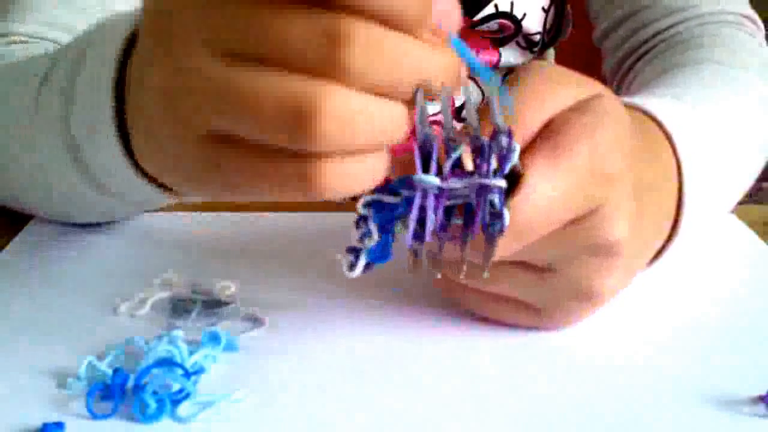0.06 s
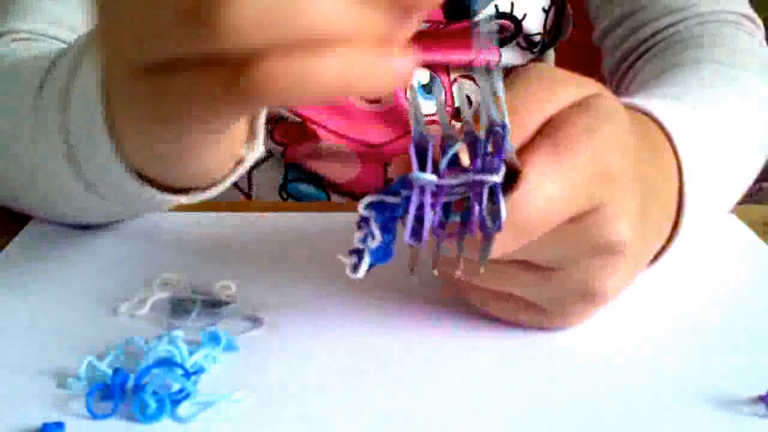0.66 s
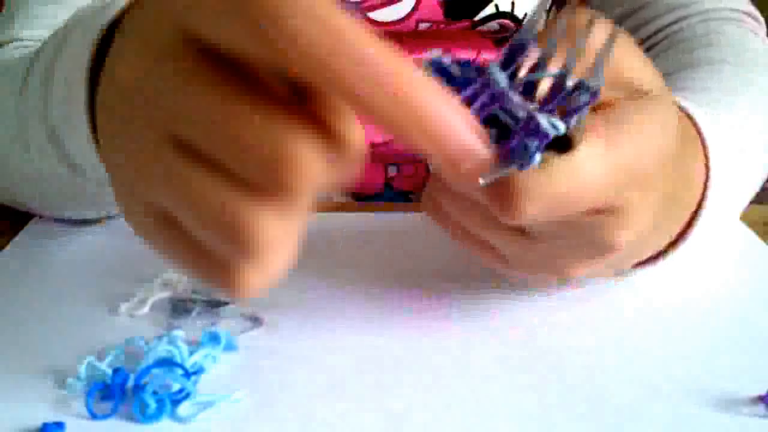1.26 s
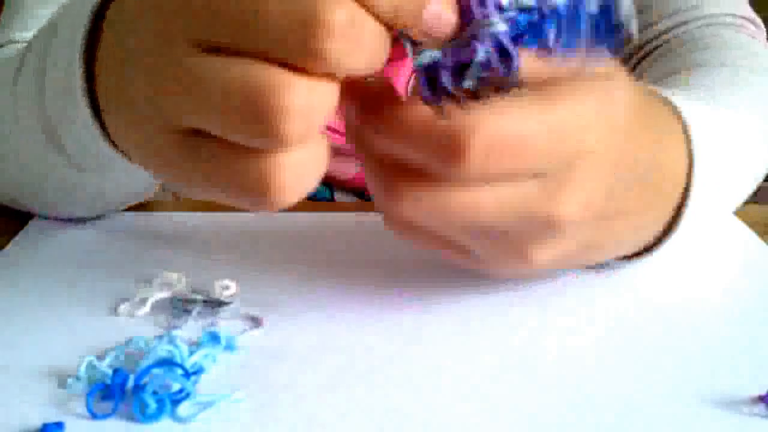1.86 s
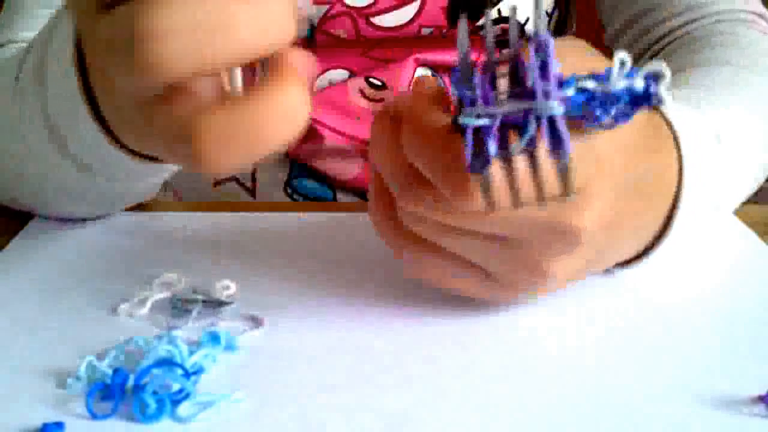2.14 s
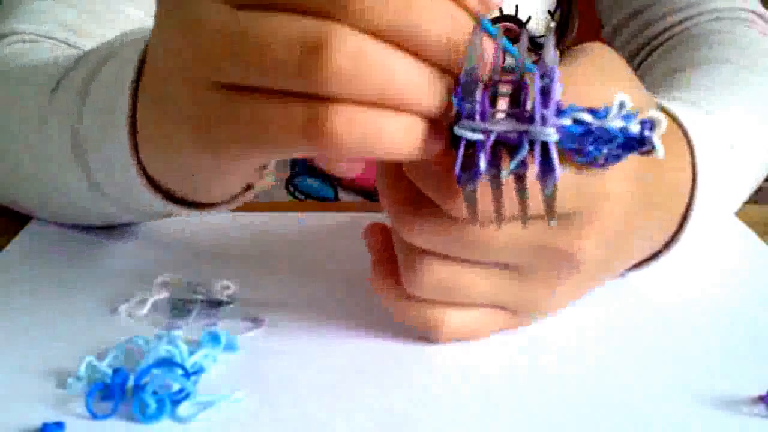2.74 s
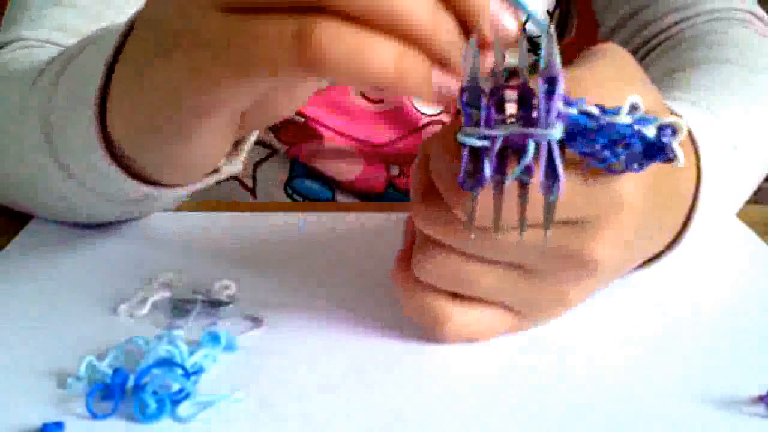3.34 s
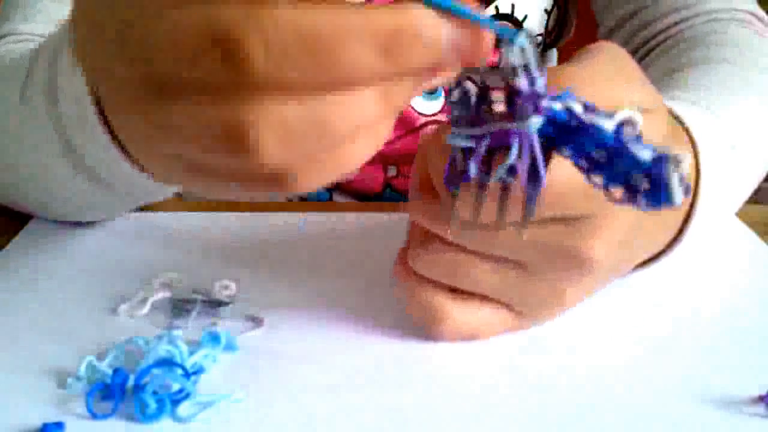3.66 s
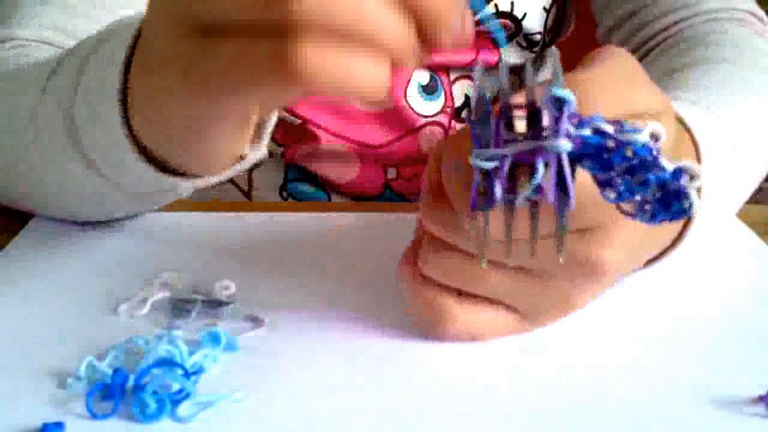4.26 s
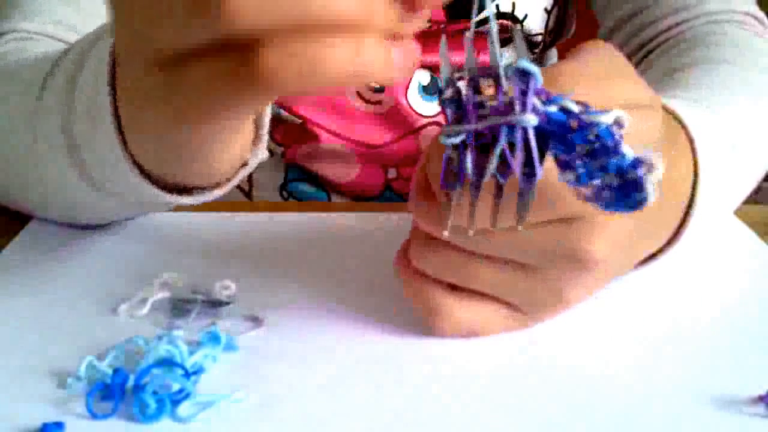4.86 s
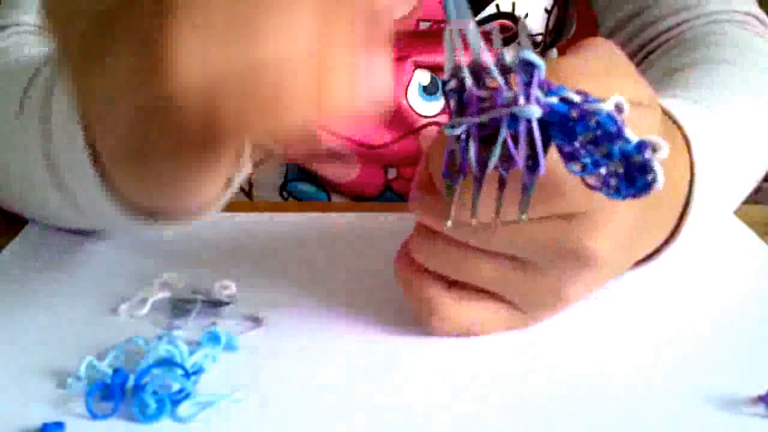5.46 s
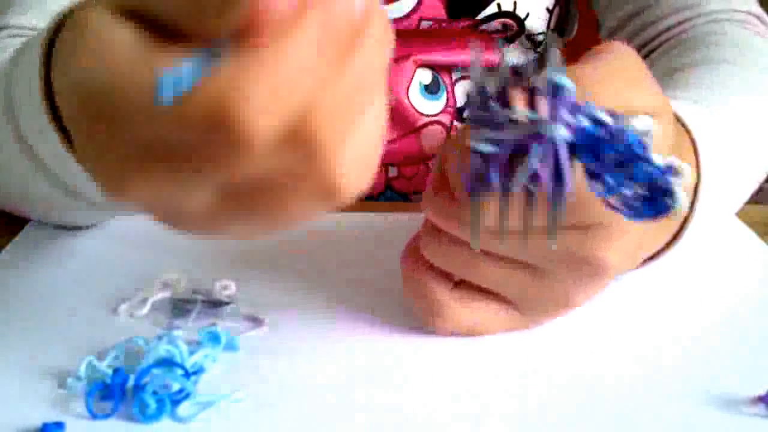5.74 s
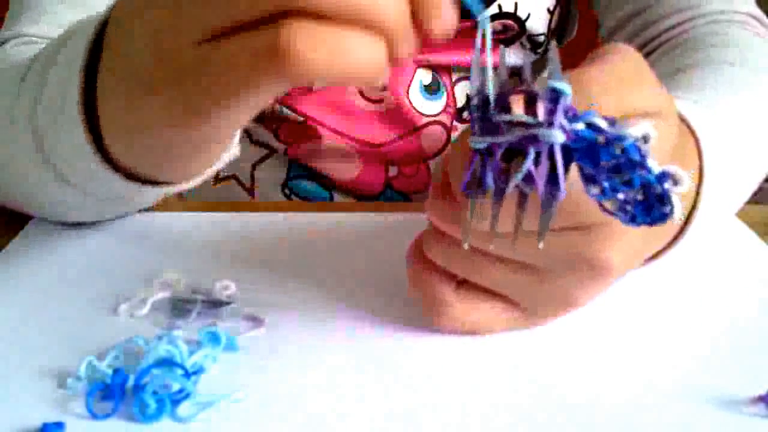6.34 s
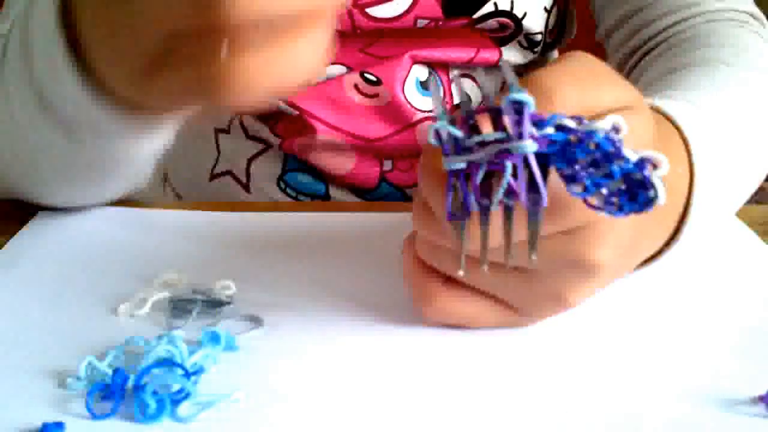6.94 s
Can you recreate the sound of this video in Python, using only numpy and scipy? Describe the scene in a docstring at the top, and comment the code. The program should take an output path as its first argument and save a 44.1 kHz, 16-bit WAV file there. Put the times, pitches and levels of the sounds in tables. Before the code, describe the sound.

Steady microphone hiss and low rumble fill a small room, with a clock ticking very faintly about once a second. Rubber bands snap lightly off fork prongs, and about two seconds in the forks hit the table with one loud, rattling knock that makes the hiss dip for a moment. Then a plastic hook clicks on the metal between more small snaps, ending with a soft swish of cloth.

```python
"""Weaving a rubber band bracelet

A plastic hook works bands over two metal forks at a table in a small quiet room; a clock ticks faintly.
Bands snap and rub on the tines (the prongs), the hook clicks on them, and a sleeve swishes.
Once, the fork handles knock hard on the table. This overloads the hissy microphone,
which turns itself down and slowly recovers."""
import sys
import numpy as np
from scipy import signal
from scipy.fft import rfft, irfft, next_fast_len
from scipy.io import wavfile

SR = 44100
rng = np.random.default_rng(int(sys.argv[2]) if len(sys.argv) > 2 else 0)


def transcribe(signal):
    """Save signal, clipped to [-1, 1], as a 16-bit WAV file at the path in sys.argv[1]."""
    frames = np.atleast_2d(signal).T
    limited = np.clip(frames, -1, 1)
    pcm = np.round(limited * 32767).astype(np.int16)
    wavfile.write(sys.argv[1], SR, pcm)


N = 313110
TIME = np.arange(N) / SR
CUTOFF_HZ = 15700   # the top of the microphone's range


def from_db(db):
    """Turn decibels into a number to multiply by."""
    return 10 ** (np.asarray(db) / 20)


def rms_one(x):
    """Scale a sound so its average size (rms) is 1."""
    return x / np.sqrt(np.mean(x ** 2) + 1e-20)


def band_pass(x, low_hz, high_hz):
    """Keep what lies between two frequencies."""
    return signal.sosfilt(signal.butter(2, [low_hz, high_hz], "band", fs=SR, output="sos"), x)


def coloured(x, spectrum):
    """Shape the tone with a curve of (f/Hz, level/dB) points."""
    hz, db = np.transpose(spectrum)
    size = next_fast_len(len(x))
    bins = np.maximum(np.fft.rfftfreq(size, 1 / SR), 1)
    gain = from_db(np.interp(np.log(bins), np.log(hz), db))
    return irfft(rfft(x, size) * gain, size)[:len(x)]


def taps(times, levels_db):
    """One instant push for each contact."""
    force = np.zeros(N)
    force[np.round(times * SR).astype(int)] = from_db(levels_db)
    return force


def swell(at, half_s, level_db):
    """A smooth, bell-shaped rise and fall in level."""
    return from_db(level_db) * np.exp(-.5 * ((TIME - at) / half_s) ** 2)


def ring(force, modes):
    """A pushed object rings with its own tones (modes); each drops 60 dB in its fade time."""
    out = np.zeros(N)
    for hz, db, fade_s in modes:
        r, w = from_db(-60 / (fade_s * SR)), 2 * np.pi * hz / SR
        out += from_db(db) * signal.lfilter([0, np.sin(w)], [1, -2 * r * np.cos(w), r * r], force + 1e-18)
    return out


def burst(force, spectrum, decay_s):
    """Each tap becomes a short, dying splash of noise."""
    t = TIME[:SR // 8]
    splash = coloured(rng.standard_normal(len(t)), spectrum) * np.exp(-t / decay_s)
    return signal.oaconvolve(force, splash / np.linalg.norm(splash))[:N]


def friction(grain_db):
    """Rubbing is a dense run of tiny slips of uneven size."""
    return rng.standard_normal(N) * from_db(grain_db * rng.standard_normal(N))


# tone of the hiss and rumble: f/Hz, level/dB
HISS = [(12, -35), (20, 1), (95, -8.5), (180, -14.5), (219, -13.5), (252, -16), (274, -17), (382, -19.5),
        (534, -21.5), (649, -24), (811, -25.5), (1820, -30.5), (2760, -30.5), (15500, -34)]
# stereo width, as side (left minus right) over mid (what both share): f/Hz, level/dB
HISS_WIDTH = [(60, 2.5), (110, 3.5), (200, 1), (380, 0.5), (700, -0.5), (1290, 1), (2380, 0), (4400, -0.5),
              (8120, 0.5), (15000, 0.5)]

def microphone_hiss(level_db):
    """Steady hiss over a low rumble, nearly unrelated on the left and right."""
    mid, side = (rms_one(coloured(rng.standard_normal(N), HISS)) for _ in range(2))
    side = coloured(side, HISS_WIDTH)
    return from_db(level_db) * rms_one(np.array([mid + side, mid - side]))


# tone of a band's crack or the hook's click: f/Hz, level/dB
SNAP = [(500, -8), (1200, 3.5), (2200, -6), (4000, -3.5), (7500, -5), (9500, -4), (12500, -16),
        (16000, -17)]

def snap(force, decay_s):
    """A sudden slip or touch makes a tiny burst of noise."""
    return burst(force, SNAP, decay_s)


def rubber_band(force, hz, fade_s):
    """A stretched band twangs briefly, with a weaker, shorter tone an octave up."""
    return ring(force, [(hz, 0, fade_s), (2 * hz, -9, 0.78 * fade_s)])


# tones of one tine: f/Hz, level/dB, fade/s
TINE_MODES = [(3110, 1, 0.075), (5720, -7, 0.035), (8400, -6, .06), (11060, -13, .06)]

def tine(force):
    """A thin metal prong gives a high ping."""
    return ring(force, TINE_MODES)


# strong tones of a whole fork: f/Hz, level/dB, fade/s
FORK_MODES = [(2960, -28, 0.035), (4304, -27.5, 0.059), (5320, -29, 0.059), (6363, -14, 0.127),
              (7800, -12, .025), (8210, -15, 0.022), (8340, -5.5, 0.042), (8430, -4.5, .028),
              (9060, -8.5, .035), (8600, -11, 0.028), (10360, -18, .05)]
# its many close overtones, blurred into noise: f/Hz, level/dB
CLATTER = [(2000, -31), (4500, -19), (5700, -23), (6350, 1), (7300, -18), (8400, 6), (9700, -18),
           (10600, -5), (12200, -19), (13800, -6), (15000, -9), (15800, -1.5)]

def fork_body(force, clatter_db=20):
    """A few strong tones stand out of a dense metal clatter."""
    return ring(force, FORK_MODES) + from_db(clatter_db) * burst(force, CLATTER, decay_s=0.0041)


# tones of the table top: f/Hz, level/dB, fade/s
TABLE_MODES = [(166.5, -18.5, 0.22), (264, -20.5, 0.12), (318, -18, 0.091), (465, -15.5, 0.095),
               (511.5, -6, 0.13), (595.5, -3, 0.07), (830, 2, 0.017), (1047, -1, 0.019),
               (1220, -18, 0.0086), (1362, -19.5, 0.19), (1855, -12.5, 0.012)]

def table_top(force):
    """The wood answers with low, short tones."""
    return ring(force, TABLE_MODES)


# bands slipping off a tine: t/s, crack/dB, band pitch/Hz, twang/dB, tine/dB
SLIPS = [(0.734, -25, 466, -50, -50.5), (0.958, -13, 1230, -49, -68), (3.3363, -27.5, 2134, -45, -62),
         (3.735, -35, 413, -43.5, -57), (5.375, -20.5, 688, -37, -45), (5.7264, -18, 750, -42.5, -46),
         (6.5817, -25, 471, -33.5, -46.5)]

def band_slips():
    """A band cracks free, twangs and plucks the tine; its kick shakes the fork and the table."""
    times, crack_db, _, twang_db, tine_db = np.transpose(SLIPS)
    twangs = sum(rubber_band(taps(at, db), hz, fade_s=0.049) for at, _, hz, db, _ in SLIPS)
    kick = taps(times, twang_db)
    metal = tine(taps(times, tine_db)) + from_db(-12) * fork_body(kick)
    wood = from_db(-7) * table_top(kick)
    cracks = snap(taps(times, crack_db), decay_s=0.0025)
    return cracks + twangs + metal + wood


# tones of the clock's two steps: f/Hz, level/dB, fade/s
CLOCK_TOCK = [(450, -53.5, 0.14)]
CLOCK_TICK = [(370.3, -43.5, 0.21), (1392, -54.5, 0.41), (1214, -53, .12)]

def clock(whirr_db):
    """A far clock steps about once a second; every other step is louder, with a whirr of gears."""
    tocks, ticks = np.arange(.77, 7, 2), np.arange(1.797, 7, 2)
    gears = rms_one(band_pass(friction(grain_db=2), 930, 1700))
    whirr = sum(swell(at + 0.016, 0.047, whirr_db) for at in ticks) * gears
    return ring(taps(ticks, 0), CLOCK_TICK) + ring(taps(tocks, 0), CLOCK_TOCK) + whirr


# bands dragging along a tine: t/s, half length/s, band pitch/Hz, band/dB, fork/dB
RUBS = [(0.785, 0.035, 466, -51, -73), (1.388, 0.037, 308, -49.5, -73), (3.06, 0.017, 356, -50, -70),
        (3.066, .01, 1010, -47.5, -73), (3.555, 0.025, 600, -62, -60)]

def band_rubs():
    """Friction makes a dragged band hum and stirs the fork softly."""
    drag = friction(grain_db=11)
    metal = rms_one(ring(drag, FORK_MODES))
    wood = from_db(-8.5) * rms_one(band_pass(table_top(drag), 590, 2500))   # passed on through the hand
    out = np.zeros(N)
    for at, half_s, hz, band_db, fork_db in RUBS:
        hum = rms_one(rubber_band(drag, hz, fade_s=0.027))
        out += swell(at, half_s, band_db) * (hum + wood) + swell(at, half_s, fork_db) * metal
    return out


# the hook touching a tine: t/s, strength/dB, place (0 at the root, 1 at the tip)
TOUCHES = [(1.5965, -44, 0.062), (2.3885, -52, .7), (3.8626, -29, 0.59), (4.1255, -40.5, .35),
           (4.2577, -51.5, .75), (4.5155, -50, .6), (4.9135, -44, .5), (6.0642, -45, .08)]

def hook_touches():
    """The hook clicks on the metal: near the tip it rings the tine, near the root the whole fork."""
    times, strength_db, place = np.transpose(TOUCHES)
    ping = tine(taps(times, strength_db + 20 * np.log10(place)))
    body = fork_body(taps(times, strength_db + 20 * np.log10(1 - place)), clatter_db=19)
    wood = table_top(taps(times, strength_db - 16))
    click_db = -30.5 + 0.39 * (strength_db + 49)   # a harder touch clicks only a little louder
    return snap(taps(times, click_db), decay_s=0.0021) + ping + body + wood


def handle_knock(at):
    """The handles land: the table booms, then the forks chatter against each other."""
    contact = np.arange(4)   # one blow and three ever weaker bounces
    times = at + .0023 * contact
    loss_db = 2.5 * contact[:-1]
    table_db = np.append(2, -14.5 - loss_db)
    fork_db = np.append(-29, -9 - loss_db)
    # low tones travel more slowly through the bending wood, so they arrive later
    top_hz, travel_s = TABLE_MODES[-1][0], .0008
    wood = np.zeros(N)
    for hz, db, fade_s in TABLE_MODES:
        late_s = travel_s * (np.sqrt(top_hz / hz) - 1)
        wood += ring(taps(times + late_s, table_db), [(hz, db, fade_s)])
    wood = band_pass(wood, 183, 4000)
    # an echo off the nearby arms reaches left and right at different moments
    echo = np.array([np.interp(TIME - lag_s, TIME, wood) for lag_s in (.0010, .0016)])
    return wood + from_db(-11) * echo + fork_body(taps(times, fork_db))


# the sleeve sliding as the arm moves: t/s, half length/s, level/dB
SWISHES = [(6.424, 0.021, -55.5), (6.562, 0.039, -44.5), (6.702, .022, -52), (6.833, 0.042, -41.5),
           (7.017, 0.016, -52.5)]
# tone of the cloth: f/Hz, level/dB
CLOTH = [(1000, -10), (2200, -9), (3200, -3), (5500, 2), (8500, 0), (11000, -5.5), (13000, -13),
         (16000, -23)]

def sleeve():
    """Sliding cloth fibres make a fine, bright hiss with each stroke."""
    fibres = rms_one(coloured(friction(grain_db=3), CLOTH))
    return sum(swell(*stroke) for stroke in SWISHES) * fibres


# the room's echoes, one row per frequency range: f/Hz, level/dB, fade/s
ROOM = [(199.6, -10, 0.37), (493, -7, 0.25), (1200, -8.5, 0.19), (3050, 0, 0.25), (6640, 0, 0.22),
        (13200, 2, 0.2)]

def room(x, first_echo_s):
    """Add a blur of echoes, different left and right; each range fades at its own speed."""
    t = TIME[:SR // 2]
    centres = np.array(ROOM)[:, 0]
    edges = [100, *np.sqrt(centres[1:] * centres[:-1]), CUTOFF_HZ]
    build_up = np.clip(t / first_echo_s - 1, 0, 1)
    tail = 0
    for (_, db, fade_s), low, high in zip(ROOM, edges, edges[1:]):
        fade = from_db(-60 * t / fade_s) * build_up
        echoes = rng.standard_normal((2, len(t))) * fade / np.linalg.norm(fade)
        tail = tail + from_db(db) * band_pass(echoes, low, high)
    return x + signal.oaconvolve(x, tail, axes=1)[:, :N]


def scene():
    """The handwork and the clock sound in the room, a little to the right, over the hiss."""
    handwork = handle_knock(at=1.9329) + band_slips() + hook_touches() + band_rubs() + sleeve()
    sounds = room(handwork + clock(whirr_db=-57.5), first_echo_s=0.00097)
    hiss = microphone_hiss(level_db=-42.5)
    return sounds * from_db([[-1.6], [1.1]]) + hiss * from_db([[-.3], [.3]])


def record(dry):
    """A loud peak quickly turns the microphone down, and its level creeps back up."""
    threshold_db, recovery_db_per_s, react_s = -4.2, 30, .008
    over_db = np.maximum(20 * np.log10(np.abs(dry).max(axis=0) + 1e-9) - threshold_db, 0)
    recovery_db = recovery_db_per_s * TIME
    held_db = np.maximum.accumulate(over_db + recovery_db) - recovery_db
    smooth = np.exp(-1 / (react_s * SR))
    dip_db = signal.lfilter([1 - smooth], [1, -smooth], held_db)
    clipped = np.clip(dry * from_db(-dip_db), -1, 1)   # overload flattens the biggest peaks
    treble_cut = signal.ellip(12, .1, 80, CUTOFF_HZ, fs=SR, output="sos")
    return signal.sosfilt(treble_cut, clipped)


dry = scene()
out = record(dry)
transcribe(out)
```